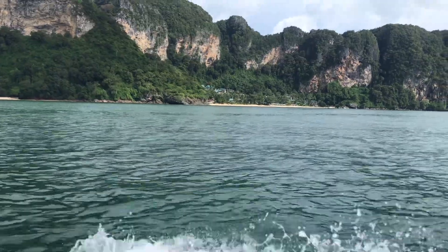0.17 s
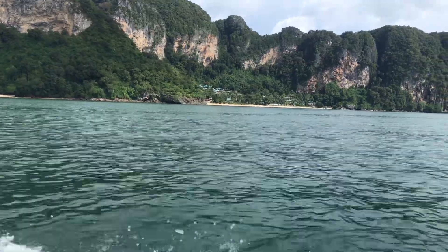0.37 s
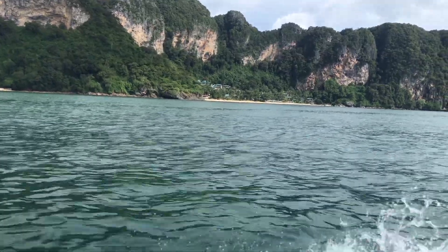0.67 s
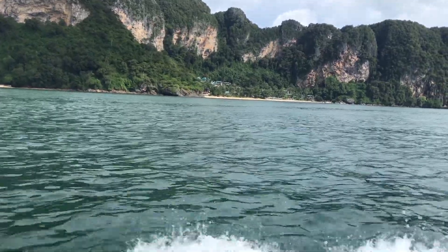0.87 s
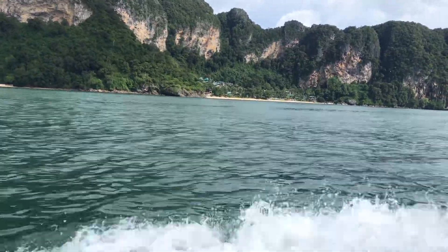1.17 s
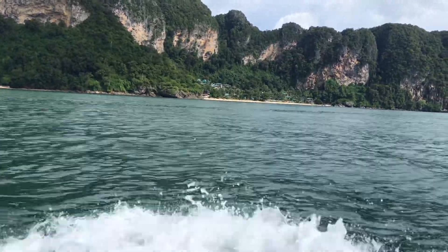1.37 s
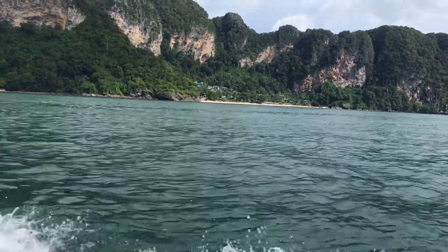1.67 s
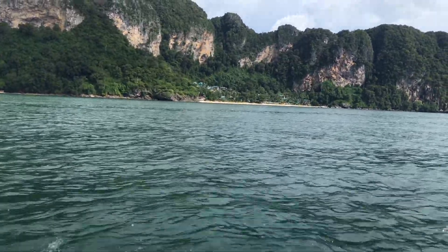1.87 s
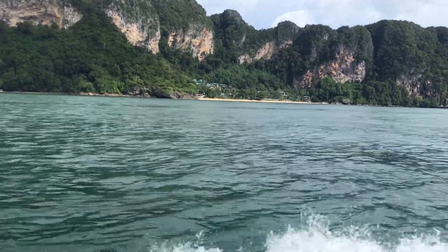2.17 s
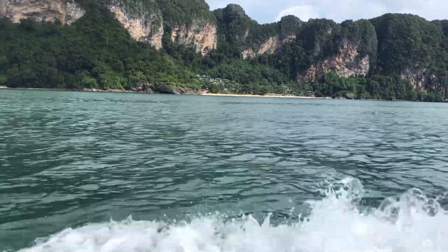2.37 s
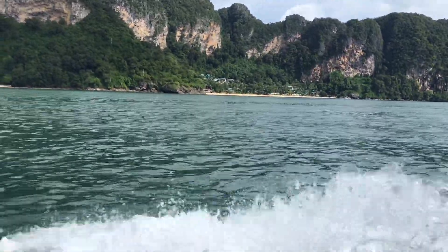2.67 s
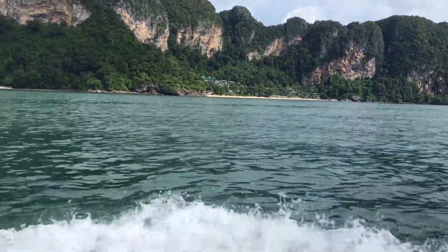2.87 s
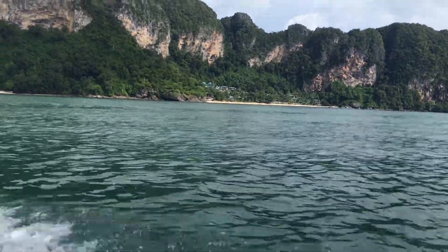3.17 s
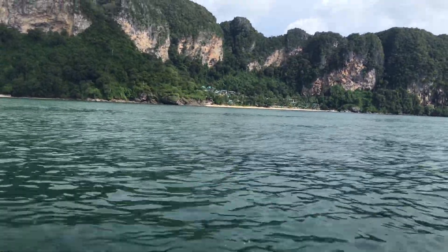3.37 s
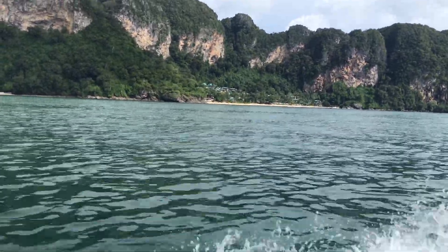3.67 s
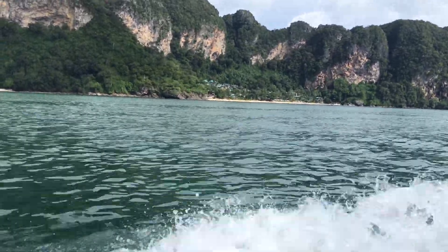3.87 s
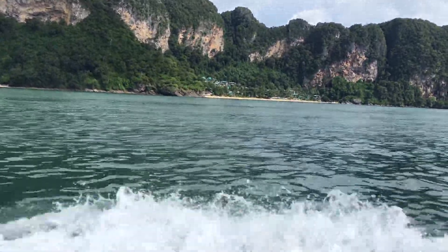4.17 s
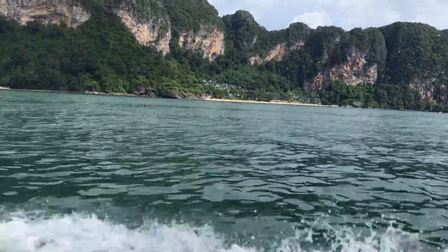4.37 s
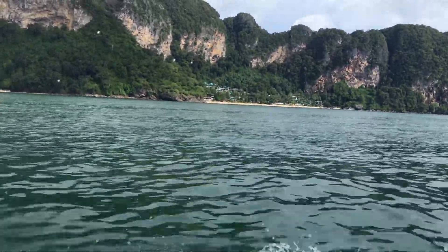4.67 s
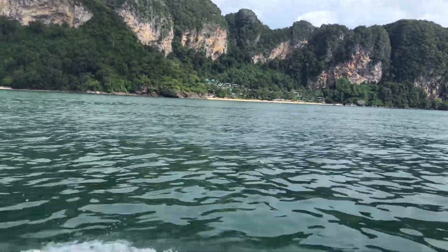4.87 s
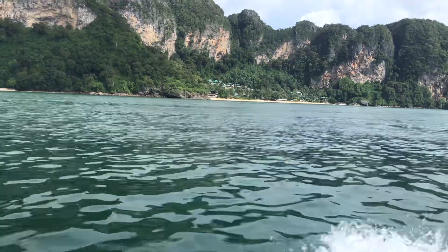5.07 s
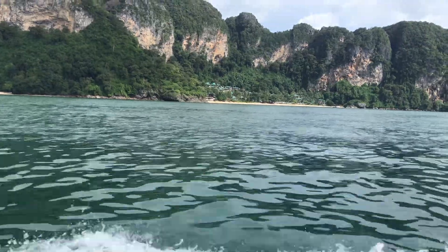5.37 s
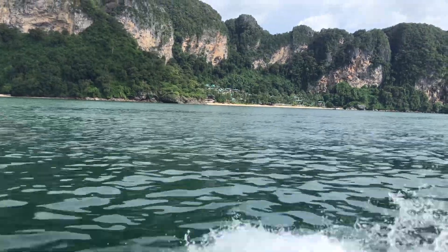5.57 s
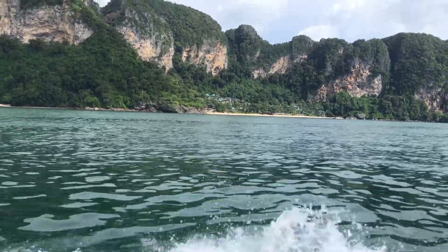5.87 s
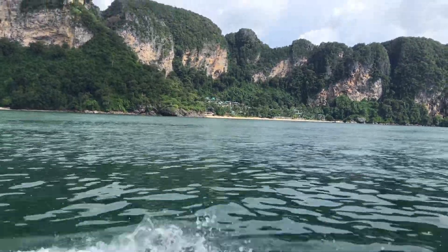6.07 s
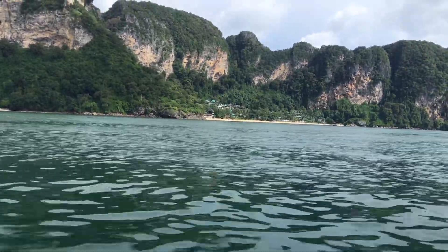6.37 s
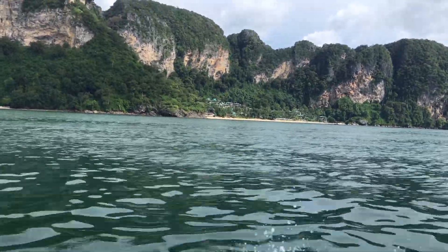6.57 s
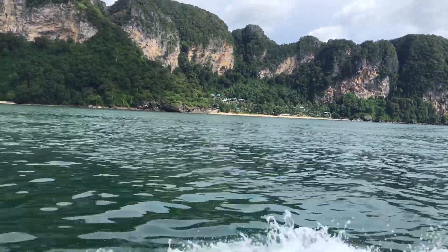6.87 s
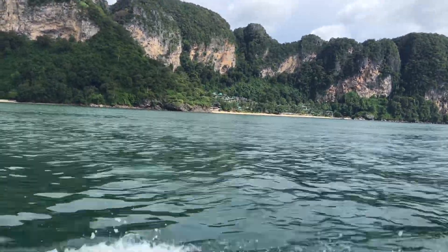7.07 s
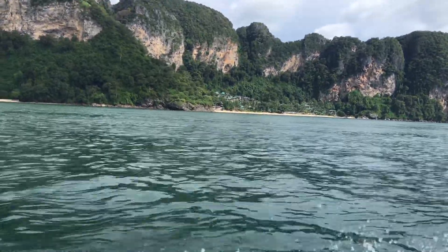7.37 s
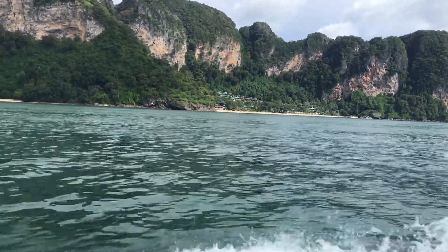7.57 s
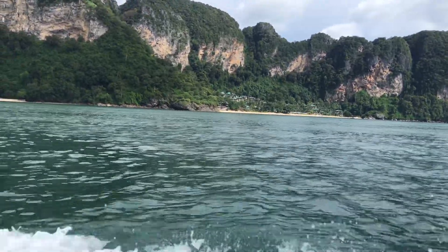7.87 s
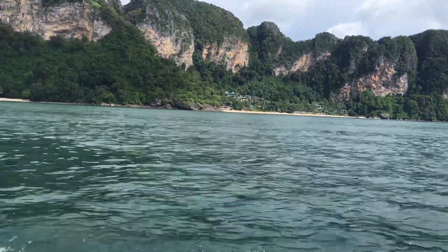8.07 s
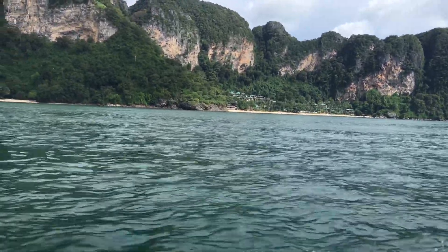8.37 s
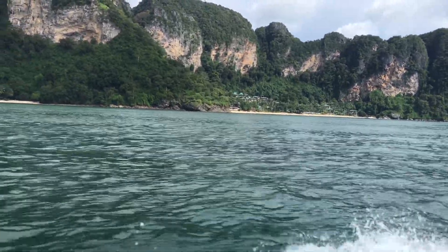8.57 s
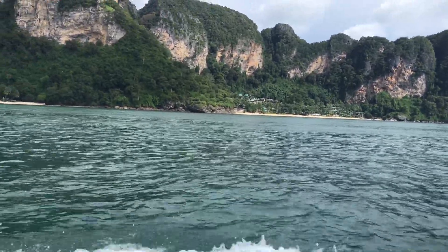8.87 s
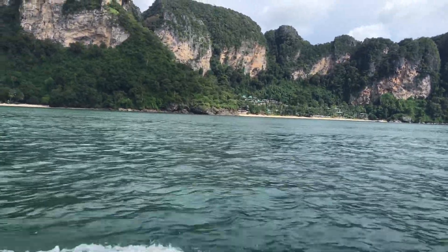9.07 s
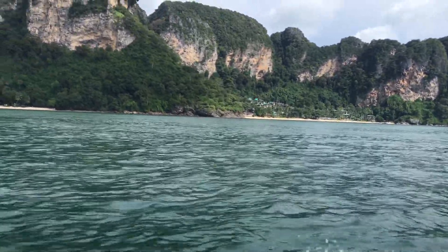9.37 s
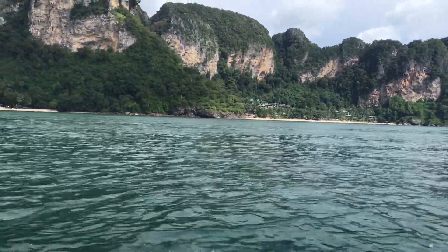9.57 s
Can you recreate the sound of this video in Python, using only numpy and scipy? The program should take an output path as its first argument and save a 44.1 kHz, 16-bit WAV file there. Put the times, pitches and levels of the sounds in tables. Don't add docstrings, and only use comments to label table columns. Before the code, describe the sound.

A boat diesel runs at steady throttle for the whole stretch of nearly ten seconds, already at full level at the start. Its deep, loud drone sits around 75 hertz, drifting only slightly up and down as waves load the propeller. Softer buzzing overtones, rapid block knock and tinny exhaust ticking ride underneath, a little brighter from about 5 to 6 seconds. Faint droplet hiss swells as the bow throws spray, most clearly near 1.4, 2.9, 4.1 and 5.9 seconds, with smaller washes later. Dull slaps drum on wooden planks, notably near 1.2, 2.3 and 3.5. Low wind gusts buffet the close hand-held microphone, strongest around 1.8, 3.4 to 3.6, 4.6 and 6.4, sometimes slightly dipping the drone. Open air, short hull reflections, no large echo; the engine is still running at the end.

```python
import sys
import numpy as np
from scipy import signal
from scipy.fft import rfft, irfft, next_fast_len
from scipy.io import wavfile
from scipy.ndimage import uniform_filter1d

SR = 44100
rng = np.random.default_rng(int(sys.argv[2]) if len(sys.argv) > 2 else 0)


def volts_from_decibels(level):
    exponent = np.asarray(level, float) / 20
    return 10 ** exponent


def log_audio(samples):
    frames = np.atleast_2d(samples).T
    limited = np.clip(frames, -1, 1)
    pcm = np.round(limited * 32767).astype(np.int16)
    wavfile.write(sys.argv[1], SR, pcm)


N = 428211
CONTROL_STEP = 40
CRUISE_PER_S = 75.6

# time_s, firings_per_s
ENGINE_SPEED = [(0.18, 75.8), (0.64, 77.7), (1.12, 73.0), (1.73, 76.3), (2.07, 76.6), (2.47, 73.8),
                (3.55, 78.1), (3.69, 75.0), (4.43, 75.5), (5.03, 77.4), (5.63, 74.3), (6.31, 77.9),
                (6.72, 75.3), (7.29, 76.0), (7.68, 74.9), (8.18, 76.2), (8.6, 73.6), (9.16, 74.3)]
# multiple_of_firing_rate, level_under_drone_db
EXHAUST_ORDERS = [(.5, -37.), (1.5, -23.), (2.5, -31.), (3.5, -25.), (4., -24.), (4.5, -35.), (5., -25.7),
                  (5.5, -28.), (6., -37.), (6.5, -45.), (7., -36.5), (7.5, -41.), (8., -45.), (8.5, -40.),
                  (9., -37.), (9.5, -41.), (10., -36.), (10.5, -42.)]
# multiple_of_firing_rate, level_under_drone_db
QUARTER_ORDERS = [(.75, -30), (1.25, -27), (1.75, -38), (2.25, -34), (4.75, -35.5), (5.75, -39),
                  (6.25, -48), (6.75, -48), (7.25, -38), (8.25, -49), (9.25, -42), (10.25, -41),
                  (10.75, -49)]
# centre_hz, width_hz, lift_db
PIPE_RESONANCES = [(320, 34, 7.5), (364, 26, 7.5), (433, 34, 6.5), (545, 28, 3), (694, 28, 11),
                   (776, 54, 2.5)]
# time_s, overtone_gain_db
FACING_PIPE = [
    (0, -.2),
    (1.1, -.3),
    (1.9, .8),
    (2.6, -.6),
    (3.2, 1.2),
    (4.2, .7),
    (4.8, 1.8),
    (6.3, 1.7),
    (7.1, 0.84),
    (9.7, 1.5),
]
CYLINDER_STRENGTH = [-1.5, 0.6, 0.2, 1.5]
# share_of_cycle, level_db
BLOCK_CONTACTS = [
    (.17, -3),
    (0.234, -0.5),
    (0.431, -1),
    (.51, -12),
    (0.669, 6.5),
    (0.757, -5.5),
    (0.924, 0),
    (0.984, 0),
]
# centre_hz, width_hz, level_db
BLOCK_MODES = [(368, 41, -7.5), (565, 50, 0.5), (692, 150, -14), (770, 130, -11.5), (937, 94, -9.5),
               (1109, 35, -2.5), (1268, 54, -6.5), (1445, 170, -16.5)]
# centre_hz, width_hz, level_db
MOUTH_MODES = [(1937, 268, 2.5), (3034, 370, -2), (3690, 420, -12.5), (4425, 410, -14.5),
               (6030, 1300, -23.5)]
# centre_hz, width_hz, level_db
TIN_MODES = [(1715, 39, -5.5), (1955, 100, -1), (2103, 72, 1), (2430, 36, -12.5), (2830, 56, -6),
             (2994, 53, -3.5), (3090, 71, -1), (3274, 100, -2.5), (3610, 83, -9.), (4290, 90, -14.5)]
# delay_ms, level_db
HULL_REFLECTIONS = [(4.1, -14.), (8.7, -13.), (13.9, -14.), (21.3, -16.)]
# peak_s, rise_s, level_over_wash_db
BOW_WAVES = [(.12, .1, 2), (1.36, .3, 5), (1.68, 0.21, 1.5), (2.23, .08, 2.4), (2.87, .22, 5.5),
             (4.14, .17, 4.5), (5.23, .05, 2.3), (5.87, .1, 5.5), (6.95, .3, 2), (7.62, .1, 1.5),
             (7.86, .12, 1.5), (8.8, .15, 2), (9.4, 0.25, 1.5)]
# frequency_hz, density_db_per_hz
SPRAY_SPECTRUM = [(300, 1), (600, -4), (1200, -6.5), (2000, -18), (2600, -26), (3300, -25), (4600, -34),
                  (5200, -35), (6500, -37.5), (7600, -45), (8500, -43), (10000, -46), (12500, -48.),
                  (15900, -54)]
# frequency_hz, density_db_per_hz
WAKE_SPECTRUM = [(3000, -3), (6000, 0.6), (9000, 0.5), (12500, -0.5), (15900, -5)]
# time_s, level_over_drumming_db
PLANK_SLAPS = [(.05, 4.5), (.9, 3.5), (1.17, 6), (1.42, 3), (1.72, 5), (2.3, 7), (3.04, 5), (3.45, 9.5),
               (4.14, 5.5), (4.52, 6), (4.81, 3), (5.53, 5), (6.6, 3.5), (7.65, 4.5), (8.68, 4.5),
               (9.48, 3.5)]
# frequency_hz, density_db_per_hz
PLANK_SPECTRUM = [(50, -15.5), (80, -3.), (110, 0.7), (135, -5), (200, -8.5), (350, -15.5), (600, -34)]
# time_s, length_s, level_over_calm_db, drone_push_down_db
WIND_GUSTS = [(0.353, .2, 3, -1), (0.722, 0.22, 6, 2), (1.504, .1, 6, .1), (1.778, 0.18, 13.5, 1.5),
              (2.196, 0.14, 6, 0.8), (2.65, .2, 1.5, -0.7), (3.082, .12, 6.5, -0.7), (3.378, 0.29, 12, 3.5),
              (3.621, .17, 16, 0.1), (4.399, .1, 6, -0.8), (4.618, .2, 13, 0), (4.847, .15, 8, 0.5),
              (5.198, .3, 7.5, 0.7), (5.451, 0.074, 10, 1.4), (6.15, .15, 4.5, -0.8),
              (6.422, 0.22, 11.5, 4.5), (6.826, .12, 4.5, -0.8), (7.298, .2, 5.5, 0.5), (7.551, .1, 4, 0.5),
              (7.853, .12, 4, 0.3), (8.4, .15, 3.5, 0.7), (9.198, .12, 6, 1.5), (9.45, 0.22, 8.5, 1.6)]
# frequency_hz, density_db_per_hz
WIND_SPECTRUM = [(12, -35.5), (20, -24.5), (30, -12), (42, -0.5), (60, 2.1), (90, -2), (130, -13.5),
                 (200, -24.5)]


def rms_one(x):
    return x / np.sqrt(np.mean(x ** 2) + 1e-20)


def in_time(rows):
    time_s, *columns = np.transpose(rows)
    return [np.interp(np.arange(N) / SR, time_s, column) for column in columns]


def drift(rate_hz):
    r = np.exp(-2 * np.pi * rate_hz * CONTROL_STEP / SR)
    noise = rng.standard_normal(N // CONTROL_STEP + 2002)
    slow = signal.lfilter([1], [1, -2 * r, r * r], noise)[2000:]
    return np.interp(np.arange(N) / CONTROL_STEP, np.arange(len(slow)), rms_one(slow))


def swells(peak_s, rise_s, fall_s, lift_db):
    peak_s, rise_s, fall_s, lift_db = [np.reshape(v, (-1, 1)) for v in (peak_s, rise_s, fall_s, lift_db)]
    late_s = np.arange(0, N, CONTROL_STEP) / SR - peak_s
    width_s = np.where(late_s < 0, rise_s, fall_s)
    lift = np.max(lift_db * np.exp(-(late_s / width_s) ** 2), axis=0)
    return np.interp(np.arange(N) / CONTROL_STEP, np.arange(len(lift)), lift)


def resonate(x, modes):
    out = 0
    for k, (centre_hz, width_hz, level_db) in enumerate(modes):
        r = np.exp(-np.pi * 1.5 * width_hz / SR)
        b = (1 - r * r) / 2 * np.array([1, 0, -1])
        a = [1, -2 * r * np.cos(2 * np.pi * centre_hz / SR), r * r]
        ringing = signal.lfilter(b, a, signal.lfilter(b, a, x))
        out = out + (-1) ** k * volts_from_decibels(level_db) * ringing
    return out


def coloured(x, spectrum, low_hz, high_hz):
    size = next_fast_len(N)
    hz = np.maximum(np.fft.rfftfreq(size, 1 / SR), 1)
    point_hz, point_db = np.transpose(spectrum)
    density_db = np.interp(np.log(hz), np.log(point_hz), point_db, left=-90, right=-90)
    shaped = rfft(x, size) * volts_from_decibels(density_db)
    band = irfft(shaped * (hz > low_hz) * (hz < high_hz), size)
    return irfft(shaped, size)[:N] / np.std(band)


def engine_speed():
    (per_s,) = in_time(ENGINE_SPEED)
    span = int(0.2 * SR)
    once = uniform_filter1d(per_s, span, mode="nearest")
    return uniform_filter1d(once, span, mode="nearest")


def pipe_lift_db(hz):
    lift_db = sum(top_db / (1 + (2 * (hz - centre_hz) / width_hz) ** 2)
                  for centre_hz, width_hz, top_db in PIPE_RESONANCES)
    return lift_db - np.mean(lift_db)


THIRD_LAG_RAD = 3.9


def order_lag(k):
    pulse_rad_per_order = 1.05
    if k % 1:
        return 1.5 + pulse_rad_per_order * min(k - 3.5, 2) - 1.35 * max(k - 5.5, 0)
    if k <= 6:
        return THIRD_LAG_RAD - pulse_rad_per_order * min(k - 3, 2)
    return -0.8


def exhaust_drone(per_s, firings, drone_db, second_db, third_db):
    def order(k, level_db, lag_rad):
        return np.sqrt(2) * volts_from_decibels(level_db) * np.cos(2 * np.pi * k * firings - lag_rad)

    out = order(1, drone_db + 0.2 * drift(28), 0)
    out += order(2, second_db + 2.0 * drift(8.4), 2.3 + 0.2 * drift(0.7))
    out += order(3, third_db + 0.46 * drift(7.3), THIRD_LAG_RAD)
    wander_db = [np.mean(drone_db) + 1.5 * drift(3.8) for _ in range(5)]
    for n, (k, under_db) in enumerate(EXHAUST_ORDERS):
        level_db = under_db + wander_db[n % 5] + pipe_lift_db(k * per_s)
        out += order(k, level_db, order_lag(k))
    for n, k in enumerate(np.arange(0.75, 11, 0.5)):
        level_db = np.interp(k, *np.transpose(QUARTER_ORDERS)) + wander_db[n % 5]
        if k > 3:
            level_db = level_db - 1.5
        early_rad = 0.4
        if k > 5.5 and k % 1 > 0.5:
            early_rad += 2.0
        out += order(k, level_db, -early_rad)
    return out


def firing_clicks(firings, spread_db):
    count = np.floor(firings + 0.49).astype(int)
    chance_db = spread_db * rng.standard_normal(1000)
    strength = volts_from_decibels(np.array(CYLINDER_STRENGTH)[count % 4] + chance_db[count])
    return strength * (np.diff(count, prepend=count[0]) > 0)


def gas_flow(clicks, rise_ms, fall_ms, leak):
    gate = clicks
    for ms in (rise_ms, fall_ms):
        r = np.exp(-1000 / (ms * SR))
        gate = signal.lfilter([1 - r], [1, -r], gate)
    return rng.standard_normal(N) * (rms_one(gate) + leak)


def block_knock(firings, clicks):
    cycle = firings / 4 % 1
    uneven = volts_from_decibels(1.4 * rng.standard_normal(N))
    strikes = np.zeros(N)
    for share, level_db in BLOCK_CONTACTS:
        wrapped = np.diff((cycle - share) % 1, prepend=0) < -0.5
        strikes += wrapped * volts_from_decibels(level_db)
    knock = rms_one(resonate(strikes * uneven, BLOCK_MODES[4:]))
    rough = rms_one(resonate(gas_flow(clicks, rise_ms=1.0, fall_ms=4.5, leak=0.75), BLOCK_MODES))
    return volts_from_decibels(-53) * knock + volts_from_decibels(-41.5) * rough


def exhaust_puffs(clicks, clatter_db):
    puffs = rms_one(resonate(gas_flow(clicks, rise_ms=0.98, fall_ms=2.6, leak=0.37), MOUTH_MODES))
    ticks = rms_one(resonate(gas_flow(clicks, rise_ms=0.6, fall_ms=2.1, leak=0.1), TIN_MODES))
    return volts_from_decibels(clatter_db) * (volts_from_decibels(-2.5) * puffs + volts_from_decibels(-5.5) * ticks)


def hull(x):
    out = x.copy()
    for k, (delay_ms, level_db) in enumerate(HULL_REFLECTIONS):
        lag = int(delay_ms * SR / 1000)
        out[lag:] += (-1) ** k * volts_from_decibels(level_db) * x[:-lag]
    return out


def bow_wave(spray_db):
    drop_db = 5.4 * np.minimum(rng.exponential(1, N), 5)
    drops = volts_from_decibels(drop_db) * (rng.random(N) < 900 / SR)
    water = rng.standard_normal(N) * (1 + 0.5 * drops) * volts_from_decibels(1.2 * drift(8.4))
    spray = volts_from_decibels(spray_db - 3.0) * coloured(water, SPRAY_SPECTRUM, 5080, 14000)
    wake = volts_from_decibels(-76) * coloured(rng.standard_normal(N), WAKE_SPECTRUM, 8000, 15000)
    return spray + wake


def plank_rumble(rumble_db):
    return volts_from_decibels(rumble_db - 3.0) * coloured(rng.standard_normal(N), PLANK_SPECTRUM, 88, 136)


def headwind(wind_db):
    gusts = rng.standard_normal(N) * volts_from_decibels(1.2 * drift(9.5))
    return volts_from_decibels(wind_db) * coloured(gusts, WIND_SPECTRUM, 22, 59.05)


def scene():
    per_s = engine_speed()
    (facing_db,) = in_time(FACING_PIPE)
    above_cruise = per_s - CRUISE_PER_S

    gust_s, length_s, lift_db, push_db = np.transpose(WIND_GUSTS)
    gust_db = swells(gust_s, length_s / 2, length_s / 2, lift_db)
    duck_db = swells(gust_s, length_s / 2, length_s / 2, push_db)

    wave_s, rise_s, lift_db = np.transpose(BOW_WAVES)
    wave_db = swells(wave_s, rise_s, 0.11, lift_db)
    shake_db = swells(wave_s, rise_s, 0.41, lift_db)
    clatter_db = -48.8 + 0.75 * shake_db + 0.45 * drift(6)

    slap_s, lift_db = np.transpose(PLANK_SLAPS)
    rumble_db = -33 + 0.25 * gust_db + swells(slap_s, 0.065, 0.065, lift_db)

    drone_db = -12.5 + 0.1 * above_cruise - duck_db + 0.28 * drift(3)
    second_db = -34.2 + 2.3 * above_cruise + 1.9 * facing_db - 0.6 * wave_db
    third_db = -25 + facing_db

    firings = 0.3 + np.cumsum(per_s * (1 + 0.001 * drift(9))) / SR
    clicks = firing_clicks(firings, spread_db=1.0)
    engine = exhaust_drone(per_s, firings, drone_db, second_db, third_db)
    engine += hull(block_knock(firings, clicks) + exhaust_puffs(clicks, clatter_db))
    water = bow_wave(-67 + wave_db) + plank_rumble(rumble_db)
    wind = headwind(-39 + gust_db + 1.5 * drift(5.9))
    return (engine + water + wind)[None, :]


def low_pass(x):
    return signal.sosfilt(signal.butter(12, 15730, fs=SR, output="sos"), x)


def record(dry):
    notch_hz, notch_width_hz, notch_depth = 10450, 760, 0.5
    b, a = signal.iirpeak(notch_hz, notch_hz / notch_width_hz, fs=SR)
    mic = dry - notch_depth * signal.lfilter(b, a, dry)
    fade_in_s = 0.001
    mic = mic * np.minimum(np.arange(N) / (fade_in_s * SR), 1)
    return low_pass(mic)


dry = scene()
out = record(dry)
log_audio(out)
```